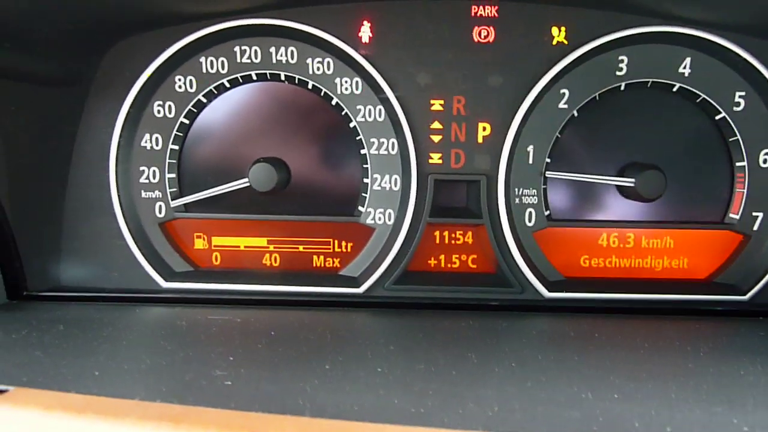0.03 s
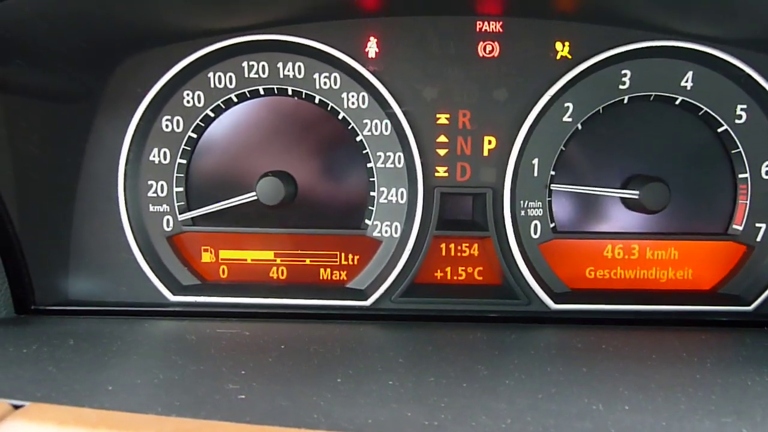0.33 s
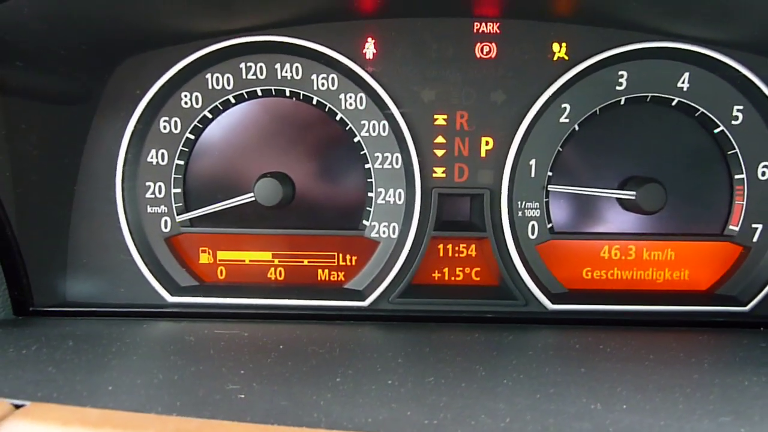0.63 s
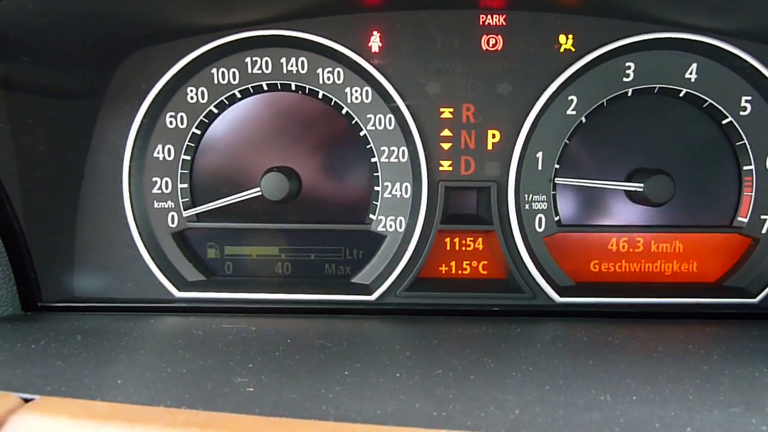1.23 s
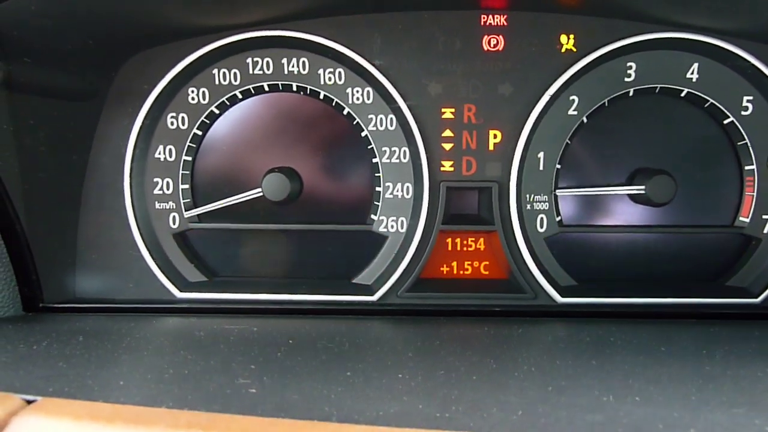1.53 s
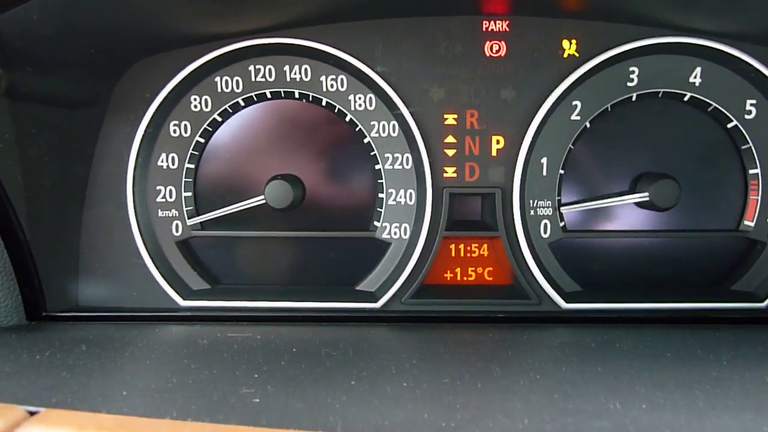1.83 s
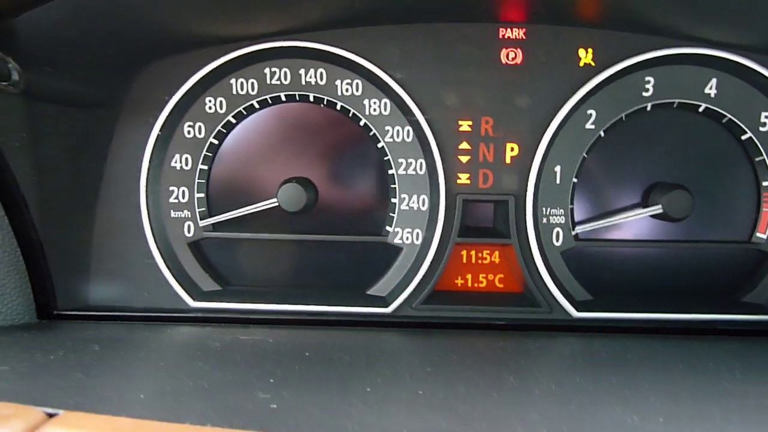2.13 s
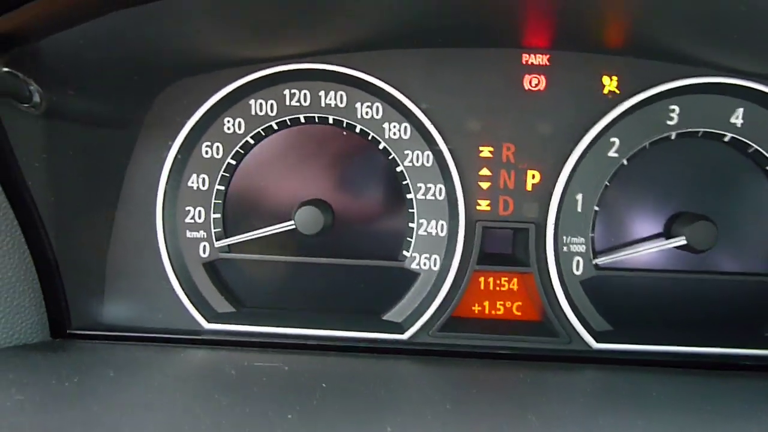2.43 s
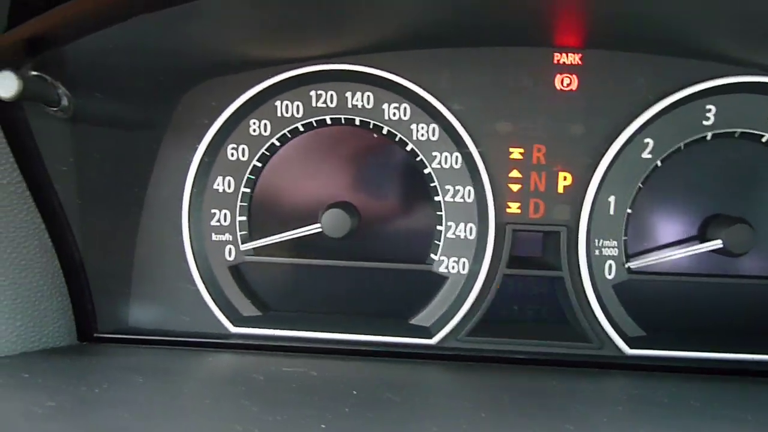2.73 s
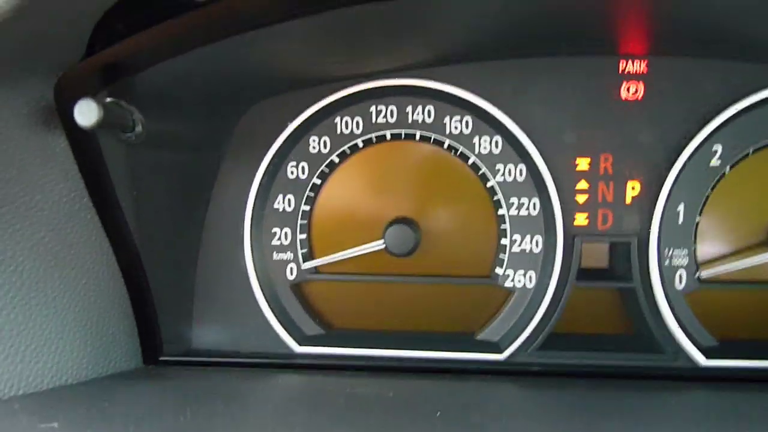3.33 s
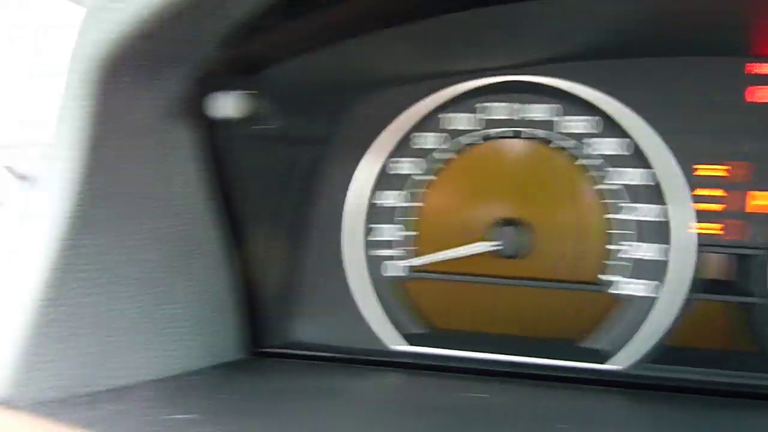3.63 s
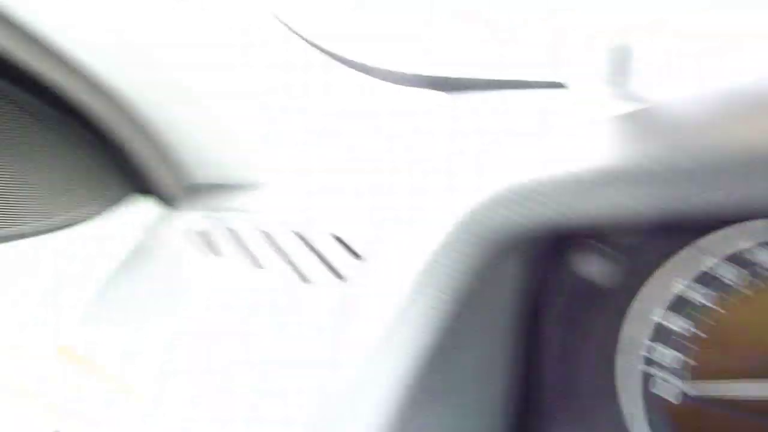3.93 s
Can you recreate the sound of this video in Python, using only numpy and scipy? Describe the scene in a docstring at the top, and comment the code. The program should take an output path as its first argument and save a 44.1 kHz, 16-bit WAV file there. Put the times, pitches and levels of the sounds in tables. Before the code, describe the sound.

A car engine idles and shuts off, then clicks and a small electric motor whirs.

```python
"""Switching off in a parked car.

Inside the cabin, on a small hand-held microphone: a V8 idles, a button clacks and the engine
shudders to a stop. A small pump hums, latches and relays clunk in the dashboard, and a geared
electric motor (probably moving the steering column) starts to whir. A hand rustles close by."""
import sys
import numpy as np
from scipy.fft import rfft, irfft, next_fast_len
from scipy.io import wavfile
from scipy.ndimage import map_coordinates

SR = 44100
rng = np.random.default_rng(int(sys.argv[2]) if len(sys.argv) > 2 else 0)


def bounce(signal):
    """Save signal as a 16-bit WAV file at the path given by the first command-line argument."""
    frames = np.transpose(np.atleast_2d(signal))
    limited = np.clip(frames, -1, 1)
    pcm = np.round(limited * 32767).astype(np.int16)
    wavfile.write(sys.argv[1], SR, pcm)


N = 176400

# rumble of engine and body, heard from the cabin (frequency [Hz], level [dB])
RUMBLE_SPECTRUM = [(20, -32), (40, -0.5), (70, -4), (110, 2.5), (220, 3.5), (300, -2.5), (520, -6.5),
                   (660, -26), (1000, -28), (2000, -34), (7000, -70.5)]


def engine(boom_waver=0.06, belt_waver=0.053, sway=0.36, stumble_db=8, throb=0.17):
    """A V8's firing boom and belt-driven tones, over rumble and hiss that throb at each firing."""
    # crankshaft (time [s], speed [turns/s])
    crank_speed = [(0, 13.1), (.25, 12.95), (.55, 13.05), (.85, 12.92), (1.1, 12.85), (1.17, 11.9),
                   (1.25, 10.4), (1.45, 8.6), (1.62, 5)]
    # engine and belt-driven parts (multiple of the crank speed, relative level [dB])
    orders = [(3, -28.5), (4, 4), (7, -27.5), (8, -10), (10.85, -2), (12, -2.5), (16, -17), (17, -23.5),
              (27, -14.5), (33.7, -18), (40.8, -15.5)]
    # firing, rumble and hiss as the engine stops (time [s], level [dB])
    firing_level = [(0, -36), (1.1, -38), (1.2, -44), (1.3, -41), (1.43, -46), (1.49, -63.5), (1.6, -95.5)]
    rumble_level = [(0, -39), (1.1, -41), (1.2, -30.5), (1.33, -52), (1.5, -40.5), (1.58, -67.5),
                    (1.75, -48), (2, -64)]
    hiss_level = [(0, -50.5), (.45, -54.5), (.7, -56), (1.2, -60.5), (1.6, -81.5), (2, -59), (2.4, -77.5)]
    # engine hiss (frequency [Hz], level [dB])
    hiss_spectrum = [(300, -38.5), (800, 11), (1500, -0.5), (3000, -12), (5000, -18), (7000, -12.5)]
    speed = curve(crank_speed)
    crank = angle(speed)
    tones = 0
    for order, db in orders:
        waver = boom_waver if order < 5 else belt_waver
        gain = amp(db) * (1 + waver * wobble(8.8))
        phase = order * (crank + sway * waver * wobble(9))
        tones += gain * np.sin(phase + rng.uniform(0, 2 * np.pi))
    pulse = 1 + throb * np.cos(4 * crank)  # four firings a turn
    rumble = amp(curve(rumble_level)) * noise(colour(RUMBLE_SPECTRUM))
    hiss = amp(curve(hiss_level)) * noise(colour(hiss_spectrum))
    slowing = 1 - speed / speed[0]  # the firing grows uneven as the crank slows
    firing = amp(curve(firing_level) + stumble_db * slowing * wobble(30.07))
    return np.sqrt(2) * firing * tones + pulse * (rumble + hiss)


def motor(waver_db=1, flutter=0.19, scatter=0.5, scrape=0.1, gear_db=-11.5, whine_noise_db=5.5):
    """The gear catches once a turn and rings the housing: tones, a whine and pulsing gear noise."""
    # motor shaft (time [s], speed [turns/s])
    shaft_speed = [(2.48, 57), (2.58, 61.2), (2.7, 58.2), (2.78, 57.6), (2.86, 55.2), (2.95, 54.2),
                   (3.05, 54.8), (3.21, 55.9), (3.35, 55.7), (3.5, 56.1), (3.75, 56.2), (3.9, 57),
                   (4, 56.4)]
    # the gear's whir, and a whine that swells twice (time [s], level [dB])
    whir_level = [(2.46, -76.5), (2.58, -50), (2.62, -35.5), (2.7, -39.5), (2.8, -33), (2.88, -31),
                  (3.12, -30), (3.3, -31), (3.5, -32), (3.75, -31.5), (3.9, -33.5), (4, -39.5)]
    whine_level = [(2.48, -75.5), (2.54, -49), (2.6, -45), (2.78, -50), (2.9, -80), (3.65, -71),
                   (3.85, -49.5), (4, -60)]
    # gear tones (multiple of the shaft speed, level at the start [dB], level under way [dB])
    gear_orders = [(0.97, -21, -17), (2.92, -16, -20), (4.13, -19.5, -23), (4.995, -13, -12),
                   (6.07, -21.5, -25.5), (6.993, 2.5, 1), (8.03, -3, -8), (8.94, -1.5, -6), (10, -4.5, -4),
                   (11.5, -20.5, -30.5), (13.22, -20, -13.5), (14.35, -20, -24), (15.25, -24.5, -23.5),
                   (16.13, -18.5, -13.5), (18.4, -30.5, -38.5), (17.9, -20, -31), (19.8, -20, -25),
                   (23.34, -30, -24.5), (25.9, -29.5, -31), (24.3, -24.5, -37.5)]
    # whine tones (multiple of the shaft speed, relative level [dB])
    whine_orders = [(16, 2.5), (20, 1.5), (26, -22.5)]
    # noise of the gear and of the whine (frequency [Hz], level [dB])
    gear_spectrum = [(100, -8.5), (250, 1), (480, 5), (700, -6.5), (1150, -5), (1600, -7.5), (2400, -18.5),
                     (3050, -8), (3800, -18), (5000, -22.5), (7000, -32)]
    whine_spectrum = [(300, -18.5), (520, -6.5), (780, -11), (1100, 0), (1450, -14), (3000, -18),
                      (7000, -33.5)]
    speed = curve(shaft_speed)
    shaft = angle(speed)
    settled = curve([(3.06, 0), (3.4, 1)])  # the gear's tone changes between these times

    def tone(order, sweep_from_hz=400, sweep_s_per_hz=4.5e-5):
        """One multiple of the shaft speed; within each turn the higher tones arrive later."""
        lag = np.pi * sweep_s_per_hz * (order * speed.mean() - sweep_from_hz) ** 2
        gain = np.sqrt(2) * amp(waver_db * wobble(5.04))
        return gain * np.cos(order * shaft - lag + scatter * rng.normal() + flutter * wobble(48))

    tones = sum(amp(early + (late - early) * settled) * tone(order) for order, early, late in gear_orders)
    whine = sum(amp(db) * tone(order) for order, db in whine_orders)
    whine += amp(whine_noise_db) * noise(colour(whine_spectrum))
    gear = amp(gear_db) * (1 + scrape * np.cos(shaft)) * noise(colour(gear_spectrum))
    return amp(curve(whir_level)) * (tones + gear) + amp(curve(whine_level)) * whine


def clicks(thump_edge_hz=534, crack_edge_hz=2490, crack_db=2, snap_db=-10.5, latch_db=-9):
    """Switches and latches clack with a crack, ring and thump; at 1.76 s comes one very short, dry tick."""
    # clacks and the tick (time [s], thump [dB], body [dB], treble before the crack and latch gains [dB],
    # thump pitch [Hz], ring pitch [Hz], ring over the body [dB], rise [s], t60 [s])
    events = [(.197, -28.5, -34.5, -42, 226, 1110, -6, .002, .09),
              (1, -28.5, -19.5, -23, 149, 1058, -14.5, 0.0058, 0.065),
              (1.017, -29, -21, -27, 236.5, 766, -3.5, .002, .1),
              (1.762, -40.5, -34.5, -46, 239, 1100, -11, .0004, .007),
              (2.416, -16.5, -23.5, -29.5, 217, 1130, -1.5, 0.0062, 0.095),
              (2.466, -17.5, -15, -12, 261.7, 1016, -4, .004, .085),
              (2.513, -29.5, -33.5, -34, 247, 1000, -7, .003, .1),
              (2.652, -19, -14.5, -12.5, 234, 1010, 2, .0015, .075),
              (2.777, -43.5, -36, -44, 323, 1076, 3, .003, .07),
              (2.842, -26, -26, -29.5, 249, 1157, -3.5, .002, .12),
              (2.959, -54, -43.5, -52, 240, 1100, -3, .001, .03),
              (3.157, -24, -16.5, -21.5, 148, 1226, 3, .004, .06),
              (3.165, -18, -17.5, -14.5, 183.3, 1215, -5, .002, .08),
              (3.202, -34, -21.5, -27, 270, 1083, -6.5, 0.0034, 0.16),
              (3.232, -20, -18, -22.5, 220, 1040, -6, .009, .1),
              (3.465, -49.5, -40, -26, 286, 893, -3.5, .0015, .06)]
    # bright modes of the latch parts (frequency [Hz], level [dB])
    latch_modes = [(1668, -11), (1945, 9), (2860, 1.5), (3715, -12), (4880, 4), (6200, -12.5)]
    out, t = np.zeros(N), np.arange(SR // 4) / SR
    for s, low_db, mid_db, high_db, thump_hz, ring_hz, ring_db, rise, t60 in events:
        panel = noise(lambda hz: trim(hz) * below(hz, thump_edge_hz) * (1 - below(hz, 110)), len(t))
        body = noise(lambda hz: trim(hz) * (below(hz, crack_edge_hz) - below(hz, thump_edge_hz)), len(t))
        crack = noise(lambda hz: trim(hz) * (1 - below(hz, crack_edge_hz)), len(t))
        thump = panel + 0.95 * np.sin(2 * np.pi * thump_hz * t)
        ring = ringing(ring_hz, len(t))
        latch = sum(amp(db + rng.normal(0, 6.9)) * np.sin(2 * np.pi * hz * t + rng.uniform(0, 2 * np.pi))
                    for hz, db in latch_modes)
        decay, ring_decay = strike(t, rise, t60), strike(t, rise, 0.99 * t60)
        snap = (1 + amp(snap_db) * strike(t, rise, t60=0.028)) / 2  # sharpens the crack's onset
        add(out, s, amp(low_db) * burst(strike(t, rise=0.0027, t60=0.19), thump))
        add(out, s, amp(mid_db) * burst(decay, body))
        add(out, s, amp(mid_db + ring_db) * burst(ring_decay, ring))
        add(out, s, amp(high_db + crack_db) * burst(decay * snap, crack))
        add(out, s, amp(high_db + latch_db) * burst(ring_decay, latch))
    return out


def trim(hz):
    """Gain of the dashboard's resonances."""
    # dashboard trim modes (frequency [Hz], width [Hz], level [dB])
    modes = [(140, 35, -7), (194, 72, 10.5), (247.4, 38, 3.5), (501, 82, 8.5), (605, 49, -7),
             (1013, 57, 3.5), (1220, 160, -5.5), (1663, 57, 2), (1967, 350, -12), (2590, 1500, -8),
             (3615, 730, -13), (5040, 980, -19), (5740, 550, -19.5)]
    return np.sqrt(sum(amp(2 * db) / (1 + (2 * (hz - centre) / width) ** 2)
                       for centre, width, db in modes))


def knocks(rattle=0.52):
    """The settling engine and body knock, muffled and a few cycles long."""
    # soft knocks (time [s], pitch [Hz], level [dB], length [s])
    bumps = [(1.17, 229, -34, 0.028), (1.248, 175, -38, 0.026), (1.285, 93.4, -28.5, 0.067),
             (1.39, 192, -37.5, .07), (1.496, 150, -29.5, 0.016), (1.664, 404, -37.5, 0.025),
             (1.793, 85.3, -36.5, 0.037), (1.798, 175.3, -31.5, 0.059), (1.916, 238, -34, .03),
             (1.942, 193, -40, 0.047), (2.42, 480, -27, .022), (2.425, 288, -18, .022),
             (2.522, 171.5, -29, 0.058), (2.845, 94.5, -26, 0.051)]
    out, t = np.zeros(N), np.arange(SR // 4) / SR
    for s, hz, db, length in bumps:
        boom = np.sin(2 * np.pi * hz * t) + rattle * noise(colour(RUMBLE_SPECTRUM), len(t))
        add(out, s, amp(db) * burst(swell(t, length), boom))
    return out


def pump(roughness=0.2):
    """A small pump's rough, low hum rises and sags after the engine has stopped."""
    # pump hum (time [s], pitch [Hz], level [dB])
    hum = [(1.7, 108, -73), (1.9, 110.4, -40.5), (2.07, 115.6, -47), (2.2, 117.7, -42.5),
           (2.35, 114, -33.5), (2.5, 104.7, -48), (2.7, 118.8, -40), (2.9, 115, -81)]
    phase = angle(curve(hum))
    flutter = wobble(35.23) * np.sin(phase) + wobble(39) * np.cos(phase)
    return np.sqrt(2) * amp(curve(hum, column=2)) * (np.sin(phase) + roughness * flutter)


def rustles(grain_db=3):
    """Close by, a hand and sleeve brush the plastic trim in short, grainy strokes with tiny squeaks."""
    # strokes (time [s], length [s], dull level [dB], bright level [dB])
    strokes = [(1.135, 0.081, -32.5, -48), (1.973, 0.025, -41, -62), (2.063, 0.075, -39.5, -43),
               (2.215, 0.039, -34, -49), (2.271, .07, -40, -54), (2.372, 0.036, -35.5, -46.5),
               (3.529, 0.038, -52.5, -38), (3.566, 0.0092, -46.5, -36.5), (3.636, 0.087, -51.5, -38.5),
               (3.699, 0.069, -51, -42), (3.892, 0.11, -38, -41)]
    # dull and bright friction (frequency [Hz], level [dB])
    dull_spectrum = [(200, 3.5), (550, 5.5), (800, -1.5), (1150, -2), (1500, -6), (2000, -9.5),
                     (3500, -26.5)]
    bright_spectrum = [(1000, -16), (2200, 4.5), (3500, 10), (4600, 4), (6000, -0.5), (7500, -3.5)]
    # skin squeaking on plastic (time [s], pitch [Hz], level [dB], length [s])
    skin_squeaks = [(2.097, 1956, -40.5, 0.042), (2.374, 1110, -28.5, 0.021), (2.378, 1630, -30.5, 0.017),
                    (2.379, 1930, -41, 0.031), (3.571, 3400, -42, 0.016), (3.603, 3760, -40.5, 0.015),
                    (3.658, 3100, -39.5, 0.019), (3.857, 4300, -43.5, 0.01), (3.985, 1220, -35, 0.011)]
    dull, bright, squeaks = np.zeros((3, N))
    t = np.arange(SR // 4) / SR
    for s, length, dull_db, bright_db in strokes:
        add(dull, s, amp(dull_db) * swell(t, length))
        add(bright, s, amp(bright_db) * swell(t, length))
    for s, hz, db, length in skin_squeaks:
        add(squeaks, s, amp(db) * burst(swell(t, length), ringing(hz, len(t), width=0.069)))
    grain = unit(amp(grain_db * wobble(250)))
    friction = dull * noise(colour(dull_spectrum)) + bright * noise(colour(bright_spectrum))
    return squeaks + grain * friction


def cabin_air(level_db=-43.5):
    """The cabin's quiet room tone, wavering slightly."""
    # cabin air (frequency [Hz], level [dB])
    spectrum = [(15, -29), (28, -4.5), (45, -0.5), (70, 0.5), (150, 5.5), (300, -1.5), (530, -6), (800, -8),
                (1100, -12.5), (2000, -14.5), (4800, -22.5), (7500, -34.5)]
    return amp(level_db + wobble(4.2)) * noise(colour(spectrum))


def handling():
    """The hand holding the microphone puts a low rumble into it."""
    # handling swells (time [s], level [dB])
    level = [(2.1, -62.5), (2.4, -46.5), (2.75, -44.5), (2.9, -35), (3.1, -51), (3.3, -52.5), (3.48, -38.5),
             (3.65, -54.5), (4, -59)]
    # handling rumble (frequency [Hz], level [dB])
    spectrum = [(20, -33.5), (45, -26), (72, 16), (100, -3.5), (250, -29), (1000, -62)]
    return amp(curve(level)) * noise(colour(spectrum))


def ringing(hz, size, width=0.053):
    """A ring of unsteady pitch, like a cluster of close modes; width is the relative pitch spread."""
    drift = noise(lambda f: below(f, 3 * width * hz), size)
    return np.sqrt(2) * np.sin(angle(hz * (1 + width * drift)) + rng.uniform(0, 2 * np.pi))


def strike(t, rise, t60):
    """Envelope that rises, then falls 60 dB in t60 seconds."""
    return np.minimum(t / rise, 1) * amp(-60 * np.maximum(t - rise, 0) / t60)


def swell(t, length):
    """Envelope of a soft, rounded contact."""
    u = 2 * t / length
    return u ** 2 * np.exp(1 - u ** 2)


def burst(envelope, carrier):
    """The carrier under an envelope, with the energy of that envelope."""
    return unit(envelope * carrier) * np.sqrt(np.mean(envelope ** 2))


def amp(db):
    """Decibels to gain."""
    return 10 ** (np.asarray(db) / 20)


def unit(x):
    """Scale to rms 1."""
    return x / np.sqrt(np.mean(x ** 2) + 1e-20)


def colour(points):
    """Gain against frequency from (frequency [Hz], level [dB]) points on a log axis."""
    f, db = np.transpose(points)
    return lambda hz: amp(np.interp(np.log(hz + 1), np.log(f + 1), db))


def below(hz, edge_hz):
    """Gain of a steep low-pass."""
    return 1 / (1 + (hz / edge_hz) ** 8)


def curve(rows, column=1):
    """One column of a timed table, one value per sample."""
    rows = np.asarray(rows)
    return np.interp(np.arange(N) / SR, rows[:, 0], rows[:, column])


def wobble(rate):
    """A smooth random curve, rate knots a second."""
    return map_coordinates(rng.standard_normal(1024), [np.arange(N) * rate / SR], mode="wrap")


def filtered(x, response):
    """x through a frequency response."""
    size = next_fast_len(len(x) + 8192)
    return irfft(rfft(x, size) * response(np.fft.rfftfreq(size, 1 / SR)), size)[:len(x)]


def noise(response, size=N):
    """Coloured noise of rms 1."""
    return unit(filtered(rng.standard_normal(size), response))


def angle(speed):
    """Rotation angle from turns per second."""
    return 2 * np.pi * np.cumsum(speed) / SR


def add(track, s, sound):
    """Mix a sound into a track at time s."""
    part = track[max(0, round(s * SR)):][:len(sound)]
    part += sound[:len(part)]


def scene():
    """All sources in mono, from one spot in the cabin."""
    return (engine() + pump() + motor() + clicks() + knocks() + rustles() + cabin_air() + handling())[None]


def record(dry, top_hz=7750):
    """A small microphone that loses the deepest bass and the top of the treble."""
    # microphone response (frequency [Hz], gain [dB])
    response = [(10, -47), (22, -12), (33, 1.5), (50, -1.5), (6200, 0), (6900, -8.5), (7400, -18),
                (7800, -35.5)]
    return np.array([filtered(x, lambda hz: colour(response)(hz) * (hz < top_hz)) for x in dry])


dry = scene()
out = record(dry)
bounce(out)
```